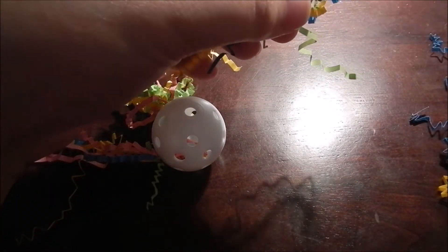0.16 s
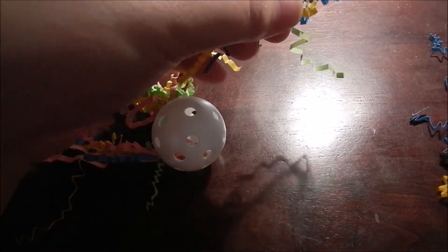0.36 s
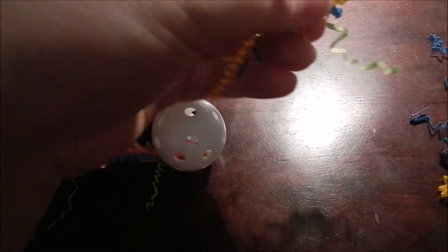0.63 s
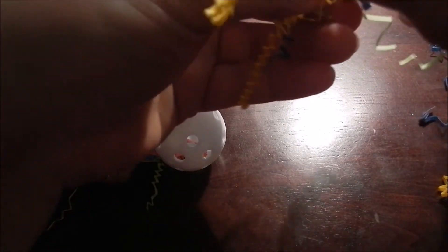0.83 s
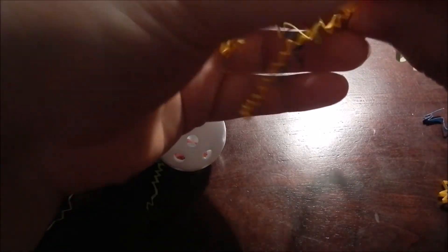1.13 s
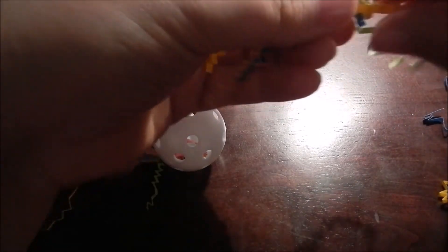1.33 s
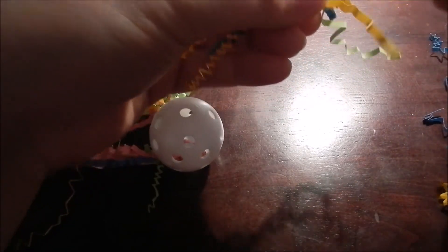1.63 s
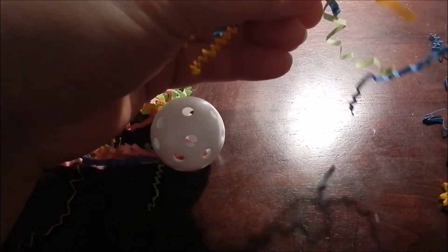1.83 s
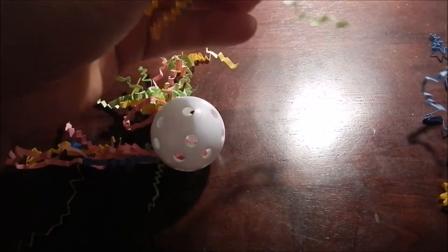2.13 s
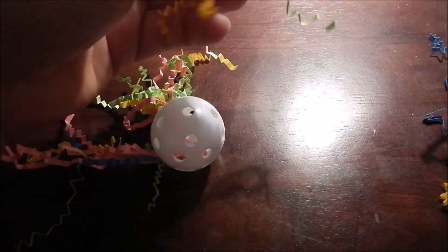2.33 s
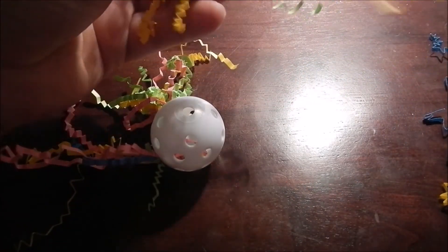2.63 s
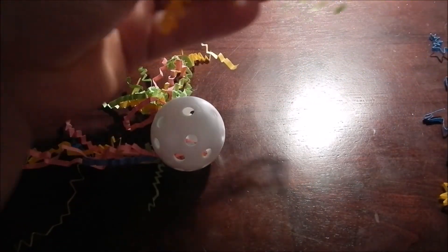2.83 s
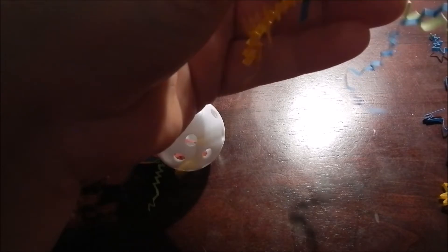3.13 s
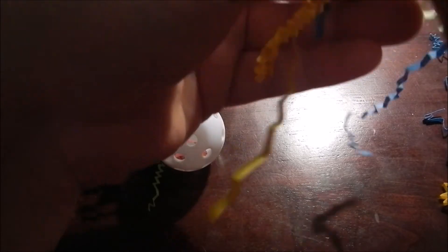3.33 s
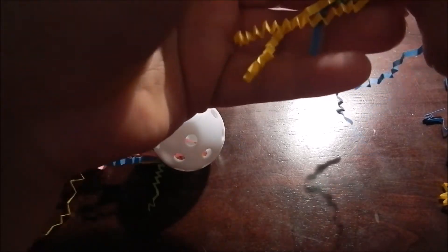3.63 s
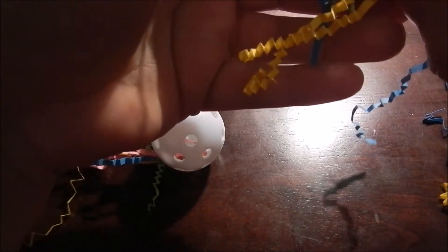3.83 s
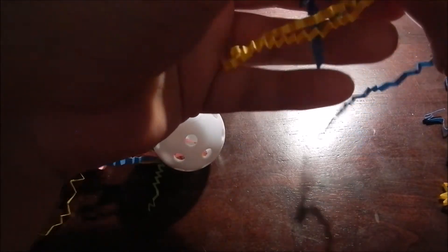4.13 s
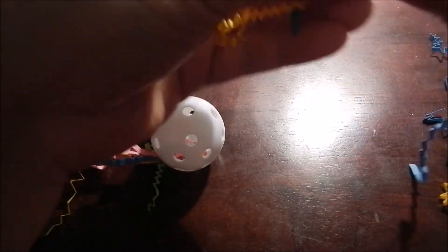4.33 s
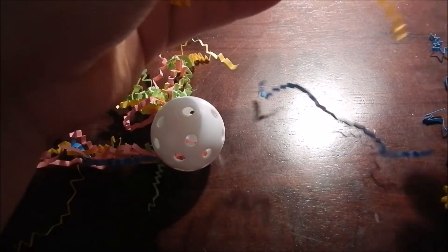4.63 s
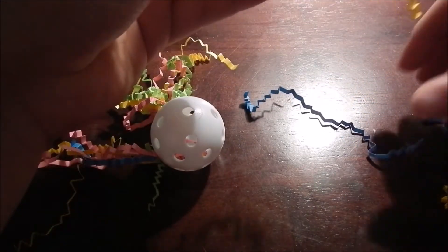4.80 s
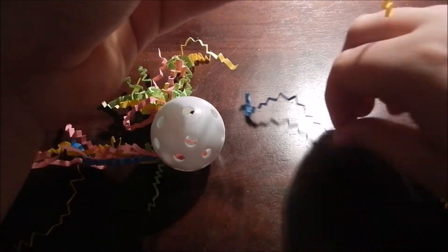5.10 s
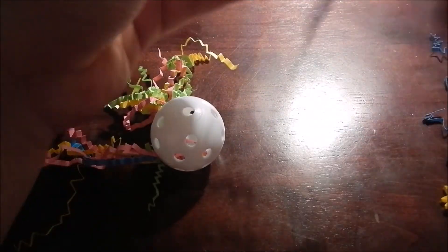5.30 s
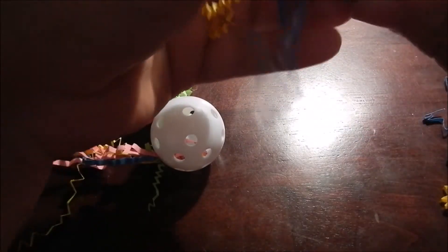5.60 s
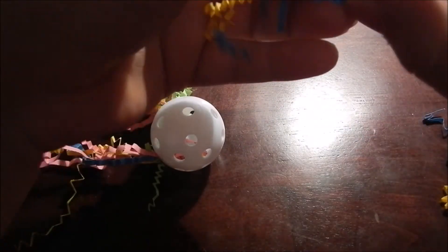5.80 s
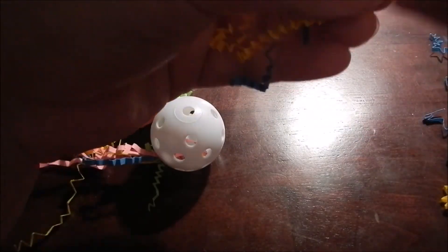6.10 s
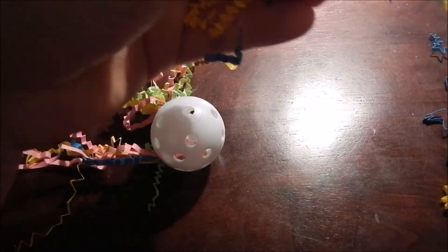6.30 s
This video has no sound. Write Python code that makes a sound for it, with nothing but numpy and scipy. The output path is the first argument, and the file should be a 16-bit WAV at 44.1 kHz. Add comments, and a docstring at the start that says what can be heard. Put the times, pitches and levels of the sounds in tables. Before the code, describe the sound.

Close by, dry paper strips crunch and swish in uneven squeezes, then a hand raps the table once; quiet room hum underneath.

```python
"""Crinkle paper gathered by hand

Hands gather zigzag strips of shredded crinkle paper on a wooden table, heard from close by.
The bundle rustles in bursts: sliding strips are uneven noise, buckling creases short ringing noise bursts.
A hand knocks the table once while picking up a strip, amid fainter touches: pulses that ring damped modes.
Rubbing skin is dull noise and a faint squeak a falling sine; mains hum and room noise lie underneath."""
import sys
import numpy as np
from scipy import signal
from scipy.fft import rfft, irfft, next_fast_len
from scipy.io import wavfile
from scipy.ndimage import uniform_filter1d

SR = 44100
rng = np.random.default_rng(int(sys.argv[2]) if len(sys.argv) > 2 else 0)


def to_wav(sig):
    """Store sig (one row per channel, or 1-D mono) as 16-bit WAV at the path in sys.argv[1].

    Samples outside -1..1 are clipped; the rate is SR.
    """
    pcm = np.clip(np.atleast_2d(sig), -1, 1) * 32767
    pcm = np.round(pcm).astype(np.int16)
    wavfile.write(sys.argv[1], SR, pcm.T)  # frames by channels


N = 284562  # length [samples]


def amp(db):
    """Decibel law: 20 dB is a tenfold amplitude."""
    return 10 ** (np.asarray(db) / 20)


def unit(x):
    """Normalisation: scales a signal to an rms of 1."""
    return x / np.sqrt(np.mean(x ** 2) + 1e-20)


def read(points, hz):
    """Interpolation of a spectrum on a logarithmic frequency axis."""
    f, value = np.transpose(points)
    return np.interp(np.log(hz + 1), np.log(f + 1), value)


def add(mix, s, sound):
    """Superposition: mixes a stereo sound in at time s, in place."""
    part = mix[:, max(round(s * SR), 0):][:, :sound.shape[1]]
    part += sound[:, :part.shape[1]]


def noise_pair(size, colour, likeness):
    """Partial coherence: coloured noise at two microphones that partly share it."""
    full = next_fast_len(size, real=True)
    hz = np.fft.rfftfreq(full, 1 / SR)
    common, apart = rfft(rng.standard_normal((2, full)))
    same = np.clip(read(likeness, hz), 0, 1)
    mid = np.sqrt(1 + same) * common
    side = np.sqrt(1 - same) * apart
    spectra = np.array([mid + side, mid - side]) * amp(read(colour, hz))
    return unit(irfft(spectra, full)[:, :size])


def tilted(x, tilt_db, pivot_hz=5600):
    """Spectral tilt: trades treble against the lower part at about equal power."""
    lowpass = signal.butter(2, min(pivot_hz, SR / 3), fs=SR, output="sos")
    low = signal.sosfiltfilt(lowpass, x)
    treble = x - low
    return (low + amp(tilt_db) * treble) / np.sqrt((1 + amp(tilt_db) ** 2) / 2)


def band(x, hz, width_hz):
    """Resonance: a band-pass peak of gain 1."""
    return signal.lfilter(*signal.iirpeak(min(hz, SR / 2.2), hz / width_hz, fs=SR), x)


MAINS_HZ = 60
# harmonics of the mains hum: (multiple of the mains frequency, rms level [dB] before a slight pan)
HUM = [(1, -55.5), (2, -50.5), (4, -82)]
# colour of the room noise: (frequency [Hz], relative density [dB])
ROOM_COLOUR = [(20, -24), (27, -12), (34, -1), (43, -12), (85, -5), (145, 0.6), (200, -8), (280, -14),
               (390, -3), (480, -7), (620, -17), (1200, -17), (2500, -23), (5000, -27), (10000, -29),
               (16000, -37)]
# left-right likeness of the room noise, also of skin sounds: (frequency [Hz], likeness [0-1])
ROOM_LIKENESS = [(60, 0.8), (140, 0.68), (300, 0.64), (700, 0.46), (1400, 0.45), (3000, 0.038),
                 (15000, 0.1)]


def background(room_db=-54.5):
    """Harmonic series and diffuse field: steady mains hum over the soft noise of the room."""
    t = np.arange(N) / SR
    hum = 0
    for multiple, db in HUM:
        cycles = round(multiple) * MAINS_HZ * t + rng.random()
        hum = hum + amp(db) * np.sqrt(2) * np.cos(2 * np.pi * cycles)
    pan = amp([[.3], [-.3]])
    return hum * pan + amp(room_db) * noise_pair(N, ROOM_COLOUR, ROOM_LIKENESS)


# fingers rub on each other and on the bundle: (time [s], level [dB])
RUBBING = [(0, -57), (1.4, -53.5), (2.1, -63), (2.4, -53), (2.6, -59.5), (4.8, -58.5), (5.4, -59.5),
           (6.1, -51.5), (6.45, -59)]
# dull colour of rubbing skin: (frequency [Hz], relative density [dB])
SKIN_COLOUR = [(60, 2), (150, -33), (250, -5.5), (300, -4.5), (400, 8), (500, -0.5), (650, -5),
               (1100, -2.5), (1600, -1.5), (3000, -11.5), (16000, -64)]


def fingers():
    """Friction noise: dry skin rubs dull and soft as the hands shift."""
    level_db = np.interp(np.arange(N) / SR, *np.transpose(RUBBING))
    return amp(level_db) * noise_pair(N, SKIN_COLOUR, ROOM_LIKENESS)


# faint stirring of paper that is only held; it dies down as one hand reaches for a strip:
# (time [s], level before the paper's overall gain [dB])
HOLDING = [(0, -55), (.35, -55.5), (1.1, -50.5), (2.6, -56.5), (3.3, -53.5), (3.85, -55.5), (4.85, -64),
           (5.4, -62), (6.45, -61.5)]
# squeezes of the bundle: (moment of most pressure [s], level before the paper's overall gain [dB],
# swell [s], release [s], treble tilt [dB])
SQUEEZES = [(.77, -49.5, 0.13, 0.027, 1), (.9, -40, 0.11, 0.15, 3), (1.32, -40, 0.14, 0.076, 0),
            (1.45, -37.5, 0.16, 0.13, 1.5), (1.74, -42, 0.13, 0.078, 8), (1.93, -46.5, 0.092, 0.22, -3),
            (2.154, -34.5, 0.035, 0.09, 5.5), (2.29, -34.5, 0.07, 0.12, 16),
            (2.39, -30.5, 0.13, 0.093, 9.5), (2.64, -52, 0.091, 0.11, 2), (2.87, -53, 0.045, 0.049, 5),
            (3.14, -51, 0.089, 0.2, 2), (3.39, -39, 0.046, 0.052, 2), (3.54, -51, 0.14, 0.16, 6),
            (3.715, -45, 0.035, 0.04, 5), (3.94, -45, 0.016, 0.02, 10), (4.055, -42.5, 0.073, 0.17, 1.5),
            (4.275, -37, .13, .11, 5.5), (4.44, -47, .06, 0.053, 5.5), (5.2, -49.5, 0.13, 0.072, 6.5),
            (5.43, -49.5, 0.055, 0.06, 1), (5.55, -42.5, 0.041, 0.089, 5.5), (5.66, -42.5, .11, .17, 0),
            (5.9, -39.5, 0.086, 0.069, 3.5), (6.075, -37.5, 0.08, 0.09, 3), (6.27, -52, 0.035, 0.033, 5)]


def handling(holding_tilt_db=-1.5, depth_db=10, roundness=1.64):
    """Power summation: squeezes swell and let go, and the strongest weighs most in the brightness."""
    # depth_db is gained over the swell and lost over the release; roundness 1 is a pointed peak, 2 a bell
    t = np.arange(N) / SR
    power = amp(np.interp(t, *np.transpose(HOLDING))) ** 2
    weighted_tilt = power * holding_tilt_db
    for s, db, swell_s, release_s, tilt_db in SQUEEZES:
        away = np.maximum((s - t) / swell_s, (t - s) / release_s)
        near = away < 10
        squeeze = amp(db - depth_db * away[near] ** roundness) ** 2
        power[near] += squeeze
        weighted_tilt[near] += squeeze * tilt_db
    level_db = 10 * np.log10(power)
    return level_db, weighted_tilt / power


# colour of buckling creases: (frequency [Hz], relative density [dB])
CREASE_COLOUR = [(200, -60), (650, -10), (1400, -10.5), (2000, -1.5), (2600, 1), (3300, -3), (4600, -0.5),
                 (7200, 1), (8300, 0), (10500, 0.5), (13000, -0.5), (16000, -7)]
# left-right likeness of the paper, also of scuffs and reflections: (frequency [Hz], likeness [0-1])
PAPER_LIKENESS = [(300, 0.16), (1400, 0.92), (2600, 0.95), (4500, 0.56), (8000, 0.6), (14000, 0.34)]
CREASE_LEAD_S = .006  # from the start of a crease sound to its burst


def crease(ring_s, hz, ring_db, chain_db, chain_s=0.005, lead_s=0.00079, sharpness=5):
    """Snap-through buckling: one fold gives way and rings its strip, amid a short chain of slipping neighbours."""
    t = np.arange(760) / SR - CREASE_LEAD_S
    burst = np.exp(np.minimum(t, 0) / lead_s - np.maximum(t, 0) / ring_s)
    chain = amp(chain_db) * np.exp(-abs(t) / chain_s)
    sound = noise_pair(len(t), CREASE_COLOUR, PAPER_LIKENESS) * (burst + chain)
    sound = sound + amp(ring_db) * band(sound, hz, hz / sharpness)
    return sound / np.sqrt(np.sum(sound ** 2) / 2)  # equal energy for every fold


def crackle(rate, spread_db, cap, count=96):
    """Random point process: many small folds buckle at random moments, in random sizes, each with its ring."""
    folds = []
    for hz in np.geomspace(1700, 13000, count):
        ring_s = 0.0003 * np.exp(0.46 * rng.standard_normal())
        fold = crease(ring_s, hz, ring_db=6.5, chain_db=-13.5)
        folds.append(tilted(fold, 7.2 * rng.standard_normal()))
    size_db = spread_db * np.minimum(rng.exponential(1, N), cap)
    sizes = amp(size_db) * rng.choice([-1, 1], N)
    happens = rng.random(N) < rate / SR
    clicks = sizes * happens / np.sqrt(rate)
    which = rng.integers(0, count, N)
    out = np.zeros((2, N))
    for i in np.flatnonzero(clicks):
        add(out, i / SR - CREASE_LEAD_S, clicks[i] * folds[which[i]])
    # the folds share the work of the fingers, so their power holds over a tenth of a second
    power = uniform_filter1d(uniform_filter1d(clicks ** 2, size=3000), size=3000)
    return out / np.sqrt(np.maximum(power, 0) + .02 * np.mean(clicks ** 2))


# colour of sliding strips: (frequency [Hz], relative density [dB])
SLIDING_COLOUR = [(150, -19), (420, 2), (650, 2.5), (1300, 2), (2200, 5), (3400, 2.5), (4800, 2.5),
                  (7000, 0.5), (10500, -0.5), (13000, -6), (16000, -6)]


def rustle():
    """Stick and slip: harder handling buckles more folds a second; sliding strips add uneven hiss."""
    level_db, tilt_db = handling()
    folds_per_s = 540 * amp(0.26 * (level_db + 39))
    folds = amp(-1) * crackle(folds_per_s, spread_db=4.5, cap=3.23)
    grip = unit(uniform_filter1d(rng.standard_normal(N), size=700))
    hiss = noise_pair(N, SLIDING_COLOUR, PAPER_LIKENESS) * amp(2.2 * grip)
    slide = amp(-4.5) * unit(hiss)
    return amp(level_db) * tilted(folds + slide, tilt_db)


def shifting(x):
    """Time-varying filter: the tangle keeps changing shape, so narrow resonances come and go."""
    z = signal.stft(x, nperseg=1024, noverlap=512)[2]
    patches = uniform_filter1d(rng.standard_normal(z.shape[1:]), size=5, axis=0)  # over frequency
    patches = unit(uniform_filter1d(patches, size=7, axis=1))  # over time
    gain = unit(amp(1.8 * patches))
    return signal.istft(z * gain, nperseg=1024, noverlap=512)[1][:, :N]


# fixed resonances of the space around hand and table:
# (frequency [Hz], width [Hz], level relative to the direct sound [dB])
NOOK = [(1100, 160, -13), (1550, 160, -11), (4200, 300, -10), (6050, 300, -13), (7100, 350, -11),
        (9000, 300, -12), (10400, 600, -13)]
# cupped hands and bent strips ring for the length of one grasp:
# (start [s], end [s], frequency [Hz], width [Hz], level relative to the direct sound [dB])
GRASPS = [(0, 0.317, 2380, 200, -1), (0, 0.366, 2940, 90, 6), (1.248, 1.547, 3350, 650, -4),
          (1.656, 1.829, 2540, 900, 5.5), (2.148, 2.555, 2630, 845, 5), (2.95, 3.753, 1490, 250, -3),
          (3.462, 3.896, 1930, 400, -5), (5.103, 5.522, 2410, 604, 1.5), (5.525, 5.8, 2300, 600, -9),
          (5.995, 6.125, 2300, 600, -9)]


def hollows(x):
    """Cavity resonance: paper sounds through the nook under the hand and the hollow of each grasp."""
    t = np.arange(N) / SR
    out = x + sum(amp(db) * band(x, hz, width) for hz, width, db in NOOK)
    for start, end, hz, width, db in GRASPS:
        held = np.clip(np.minimum(t - start, end - t) / 0.015, 0, 1)
        out = out + amp(db) * band(x * held, hz, width)
    return out


# colour of the nearby reflections: (frequency [Hz], relative density [dB])
ECHO_COLOUR = [(100, 7), (1000, 3.5), (2500, 0.5), (6000, 1), (16000, 2.5)]


def reflections(x, t60=0.11):
    """Reverberation: the table, hands and nearby walls return a short, weak tail."""
    t = np.arange(SR // 4) / SR
    tail = noise_pair(len(t), ECHO_COLOUR, PAPER_LIKENESS) * (t > .002) * amp(-60 * t / t60)
    tail /= np.linalg.norm(tail, axis=1, keepdims=True)
    return signal.oaconvolve(x, tail, axes=1)[:, :N]


# modes of the table top: (frequency [Hz], level [dB], decay by 60 dB [s])
TABLE_MODES = [(66, -33, 0.18), (118.5, -6.5, 0.12), (147, -6, 0.19), (207, -12, 0.057), (311, -12, 0.051),
               (338.6, -10, 0.15), (380, -7, 0.17), (418, -15, 0.073), (686, -21, 0.094), (950, -10, 0.054),
               (1116, -16, 0.13), (1260, -21, .06), (1810, -24, .04), (2370, -23, .05)]
# fingers and knuckles meet the table:
# (time [s], force [dB], contact time [ms], hollow knock [dB], skin scuff [dB])
BLOWS = [(.122, -62, 3, -39, -57), (.689, -62, 3, -37.5, -64), (4.9660, -23, 0.85, -34, -37.5),
         (4.9675, -19, 4.2, -42, -63), (4.9732, -19.5, 3.8, -34.5, -61), (4.9907, -23, 2.47, -41, -44.5),
         (5.01, -40, 2.8, -62, -40), (5.036, -42, 1.6, -60, -41), (5.4075, -46, 2.8, -32.5, -62),
         (6.2546, -48, 4.9, -35.5, -47.5), (6.267, -32, 6.6, -60, -54)]
# skin scuffing on wood: (frequency [Hz], relative density [dB])
SCUFF_COLOUR = [(150, -2), (500, -6), (1100, -1.5), (1700, -6), (2400, -8), (4000, -14), (8000, -18),
                (16000, -21)]


def table(knock_hz=450, knock_t60=0.035, scuff_t60=0.11, lowest_hz=75):
    """Modal excitation: each blow pushes the modes; longer contact leaves high ones quiet, and skin scuffs."""
    t = np.arange(SR // 2) / SR
    wood = sum(amp(db - 60 * t / t60) * np.sin(2 * np.pi * hz * t) for hz, db, t60 in TABLE_MODES)
    knock = amp(-60 * t / knock_t60) * np.sin(2 * np.pi * knock_hz * t)
    knock = knock * (1 - np.exp(-t / 0.00075))  # soft onset
    out = np.zeros((2, N))
    for s, db, contact_ms, knock_db, scuff_db in BLOWS:
        phase = t * 1000 / contact_ms
        push = np.sin(np.pi * np.minimum(phase, 1)) ** 2
        ring = signal.fftconvolve(wood, push / push.sum())[:len(t)]
        scuff = noise_pair(len(t), SCUFF_COLOUR, PAPER_LIKENESS) * amp(scuff_db - 60 * t / scuff_t60)
        add(out, s, amp(db) * ring + amp(knock_db) * knock + scuff)
    # the microphone's low cut thins out the deep bass of the knocks
    return signal.sosfilt(signal.butter(N=3, Wn=lowest_hz, btype="high", fs=SR, output="sos"), out)


# a low, soft rub as the hand slides forward and opens: (time [s], level [dB])
PALM = [(.2, -75), (.55, -58.5), (.95, -62), (1.7, -71)]
# its colour: (frequency [Hz], relative density [dB])
PALM_COLOUR = [(100, -25), (190, -9), (250, 0), (330, -4), (400, -16), (1000, -40), (16000, -70)]


def palm():
    """Friction noise: the side of the hand brushes along as it moves under the bundle."""
    level_db = np.interp(np.arange(N) / SR, *np.transpose(PALM))
    return amp(level_db) * noise_pair(N, PALM_COLOUR, ROOM_LIKENESS)


# a faint falling squeak: (time [s], pitch [Hz], rms level [dB])
SQUEAK = [(.28, 1090, -80), (.32, 1054, -68), (.37, 1036, -61), (.41, 990, -76)]


def squeak():
    """Frequency modulation: a thin, brief sine sags in pitch as its phase gathers ever more slowly."""
    s, hz, db = np.transpose(SQUEAK)
    t = np.arange(N) / SR
    level = amp(np.interp(t, s, db)) * (t > s[0]) * (t < s[-1])
    cycles = np.cumsum(np.interp(t, s, hz)) / SR
    return level * np.sqrt(2) * np.sin(2 * np.pi * cycles)


# the stiffest creases snap out of the rustle:
# (time [s], relative level [dB], treble tilt [dB], ring of the strip [Hz])
SNAPS = [(.4427, -42, -6, 4600), (.7438, -37.5, 0, 5260), (0.8935, -29.5, 2, 5100), (0.915, -28, -13, 5230),
         (1.0002, -35, 1, 9400), (1.2936, -21.5, -7, 9900), (1.326, -20.5, -4, 6740),
         (1.4492, -18, -3, 3200), (1.492, -29, 2, 10700), (1.5179, -26.5, 2, 1730),
         (1.638, -36.5, 16, 9900), (1.6901, -31.5, 6, 9900), (1.7172, -30, 5, 2490), (1.7267, -24, 8, 8400),
         (1.76, -28, 8.5, 2730), (1.7863, -29, 2.5, 8100), (2.14, -28, 0, 10000), (2.1613, -21.5, 2, 9400),
         (2.221, -25, 2, 11300), (2.2659, -23, 9, 11000), (2.273, -27, 11, 2470), (2.296, -25.5, 16, 7000),
         (2.336, -24, 13, 9350), (2.351, -28, 13, 7200), (2.3723, -22.5, 3, 11400), (2.3859, -24, 0, 9500),
         (2.391, -23, 0, 9400), (2.4287, -28, -1, 2600), (2.4445, -26.5, 3, 10200),
         (2.4593, -28, -1, 10700), (2.4813, -24.5, 4, 11000), (2.5133, -26, 3, 10800),
         (2.7056, -36, -5, 4130), (2.7199, -37, -12, 2620), (3.399, -26.5, -5.5, 9600),
         (3.4158, -29.5, -23, 6200), (3.6695, -33, -8, 9900), (3.71, -35, -6, 8800), (3.842, -35, 6, 2930),
         (3.8615, -42.5, 2, 1700), (4.0184, -34, -3, 7100), (4.0276, -29.5, -6, 9500),
         (4.0464, -32.5, 12, 9900), (4.1933, -32, 8, 5300), (4.227, -29, -6, 8150), (4.247, -28, 8, 11500),
         (4.639, -35.5, -3, 7100), (4.6941, -42, -5, 7240), (5.5369, -34.5, -6, 3850),
         (6.0377, -31.5, -3, 2300)]


def snaps(followers=2, followers_db=-12, within_s=.009):
    """Triggered buckling: stiff folds give way one by one, each jolting weaker neighbours into following."""
    out = np.zeros((2, N))
    for s, db, tilt_db, hz in SNAPS:
        pan_db = .6 * rng.standard_normal()  # a little to the left or right
        gain = amp(db + 20) * amp([[pan_db], [-pan_db]])
        start = s - .0056
        burst = crease(ring_s=0.0006, hz=hz, ring_db=3.5, chain_db=-23.5, lead_s=0.00044)
        add(out, start, gain * tilted(burst, tilt_db))
        for delay_s in within_s * rng.random(followers):
            follower = crease(ring_s=0.00037, hz=hz, ring_db=-7, chain_db=-22, lead_s=0.00041)
            add(out, start + delay_s, gain * amp(followers_db) * tilted(follower, tilt_db))
    return out


def scene():
    """Superposition: paper and table close by, in a small humming room."""
    paper = amp(0.21) * hollows(shifting(rustle()) + snaps())
    knocks = table()
    room = reflections(amp(-11) * paper + amp(-20.5) * knocks)
    return paper + knocks + fingers() + squeak() + room + background() + palm()


def record(dry, edge_hz=16100):
    """Band limiting: the recorder passes only what lies below its upper edge."""
    lowpass = signal.firwin(511, edge_hz, window=("kaiser", 9), fs=SR)
    return signal.oaconvolve(dry, lowpass[None], "same")


dry = scene()
out = record(dry)
to_wav(out)
```